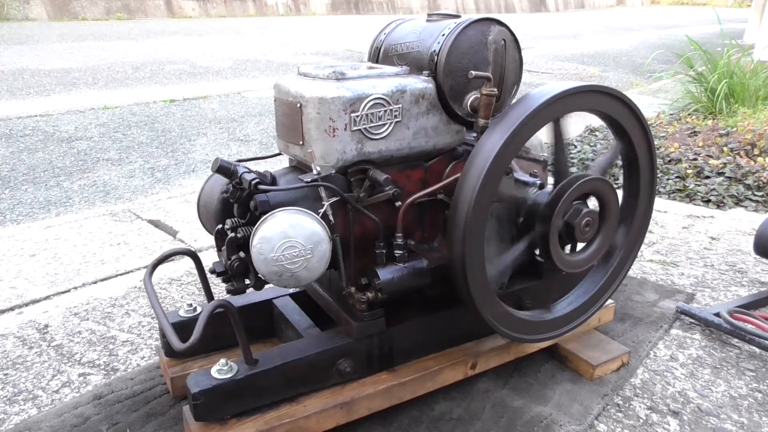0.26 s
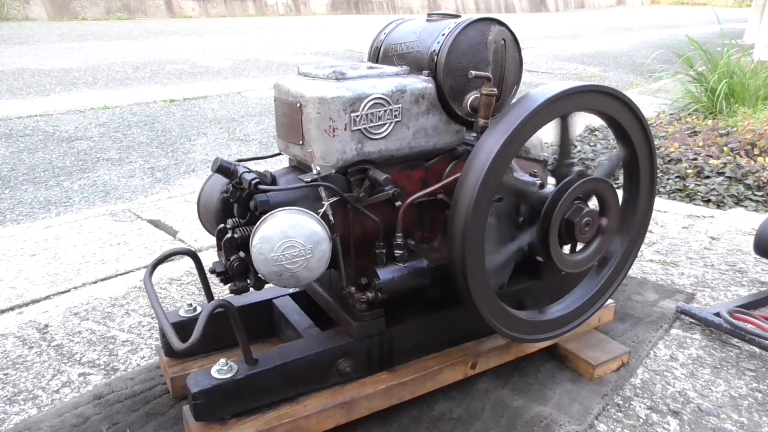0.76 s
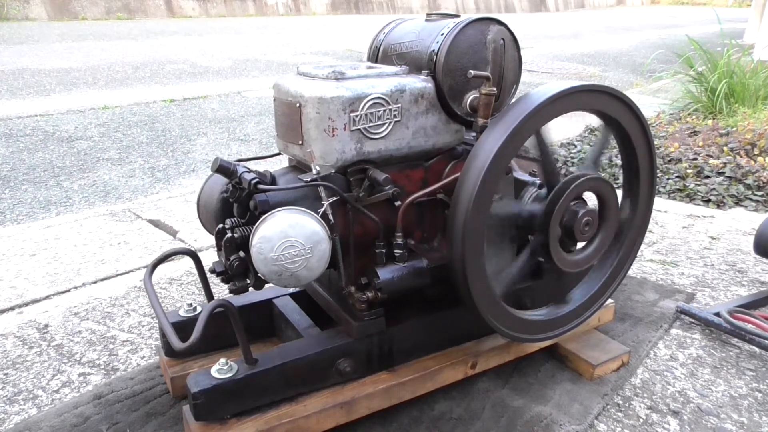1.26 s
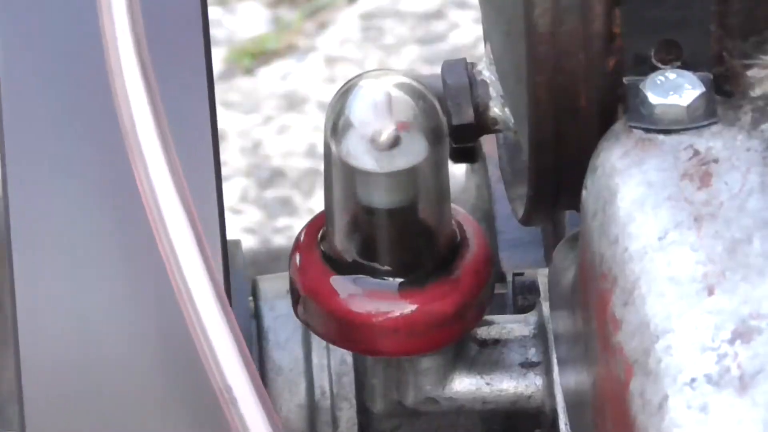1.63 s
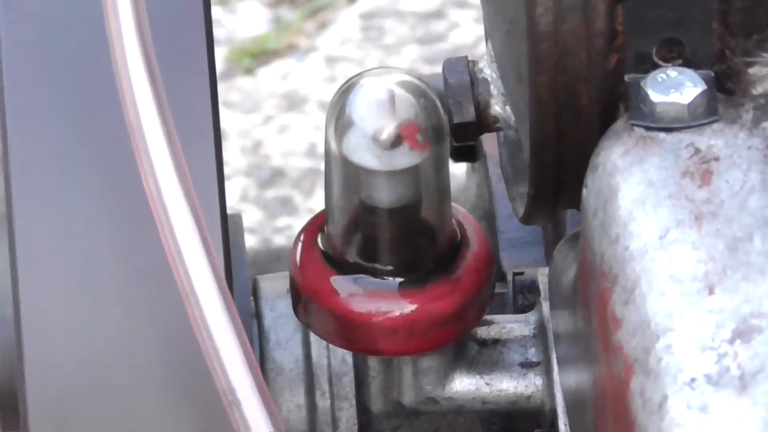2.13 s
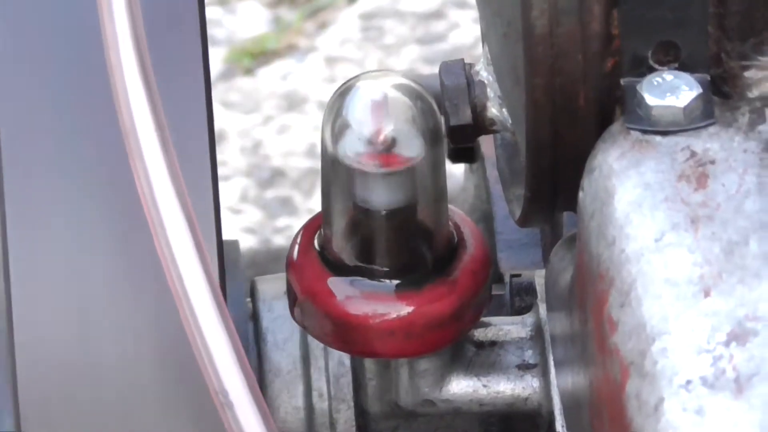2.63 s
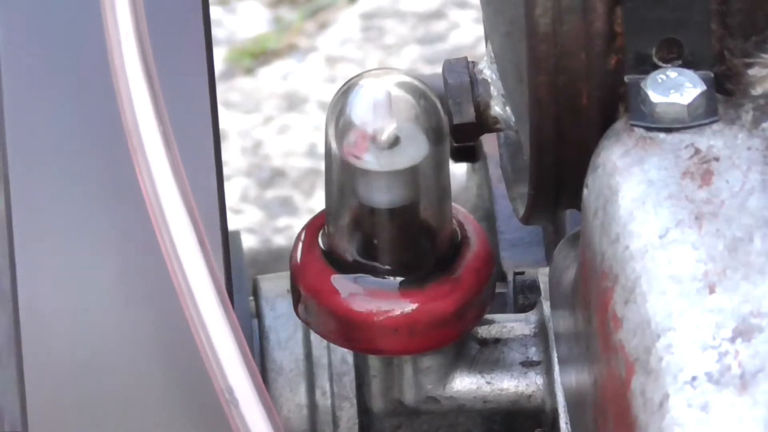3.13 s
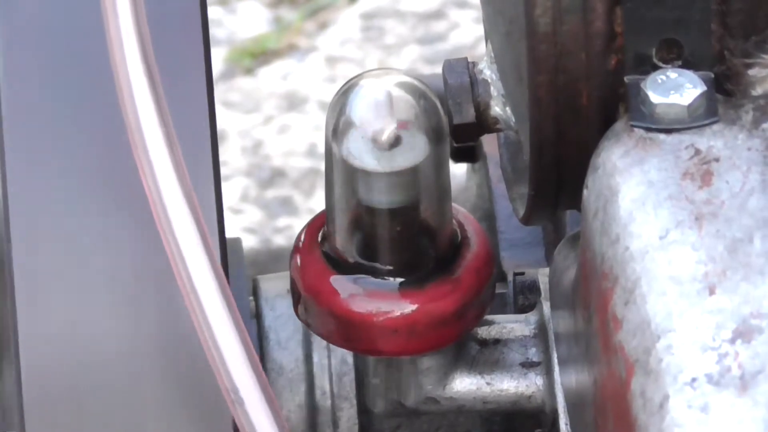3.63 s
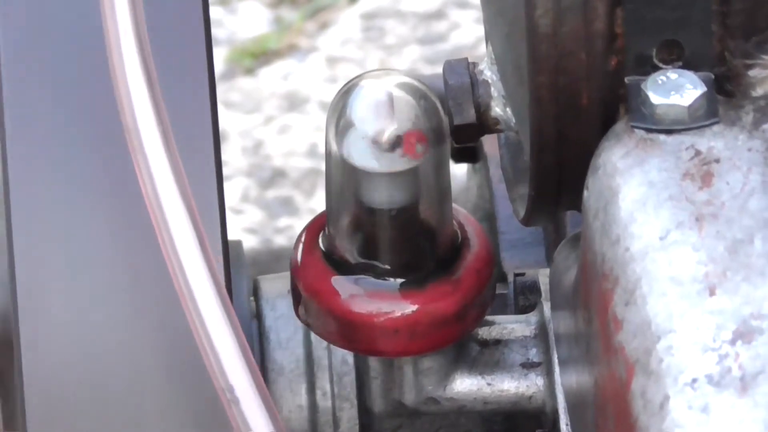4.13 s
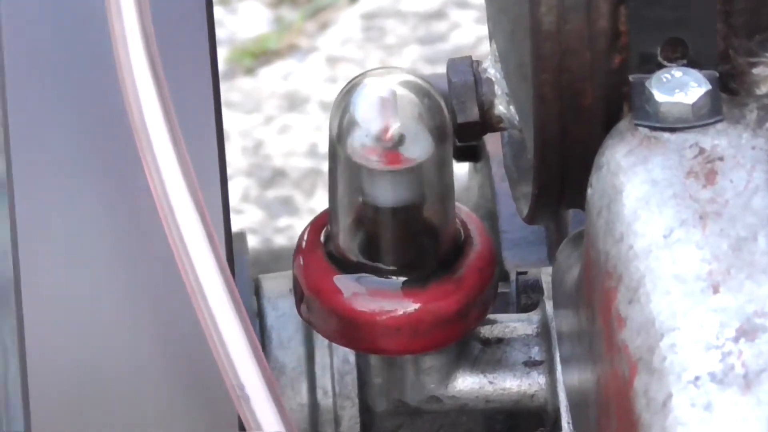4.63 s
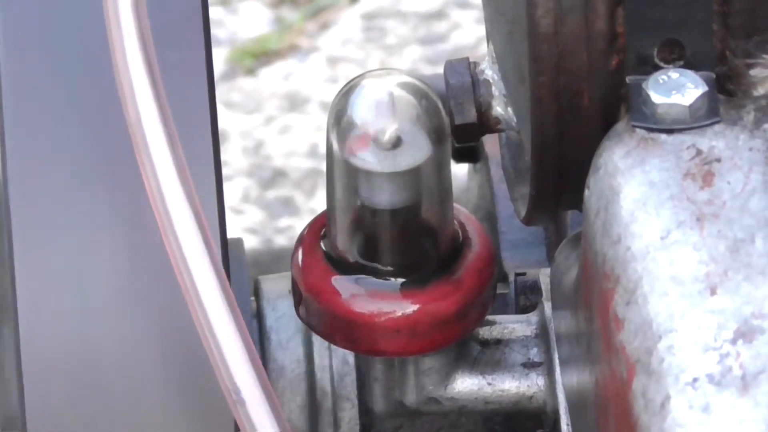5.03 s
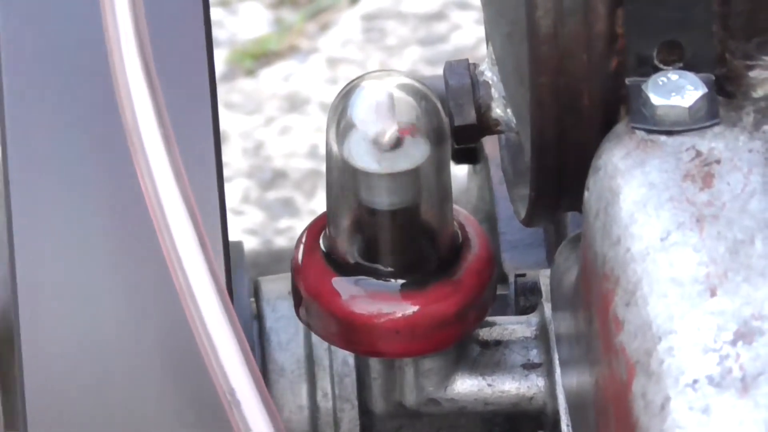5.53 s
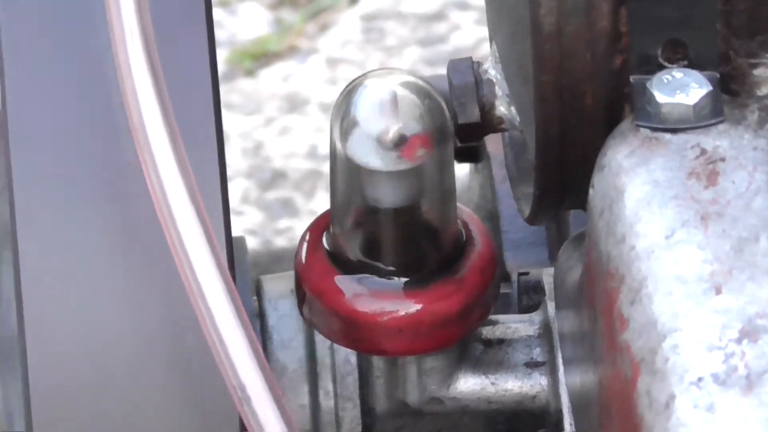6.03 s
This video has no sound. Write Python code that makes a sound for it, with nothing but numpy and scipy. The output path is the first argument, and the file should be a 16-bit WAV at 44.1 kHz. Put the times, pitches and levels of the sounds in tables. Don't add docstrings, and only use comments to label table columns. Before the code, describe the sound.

An old one-cylinder diesel idles steadily on an outdoor pavement, about three and a half cycles a second. Each cycle gives an exhaust pop, a tappet tick, a rattling firing knock and a valve clack with a low intake thump. After about a second and a half the stereo microphone jumps from a few steps away to close beside the engine, making the ticks sharper and the metal clatter more detailed.

```python
import sys
import numpy as np
from scipy import signal
from scipy.fft import rfft, irfft
from scipy.io import wavfile
from scipy.ndimage import uniform_filter1d

SR = 44100
rng = np.random.default_rng(int(sys.argv[2]) if len(sys.argv) > 2 else 0)


def rack_gain(trim_db):
    fader = np.asarray(trim_db, float)
    return 10 ** (fader / 20)


def generate_wav(sig):
    pcm = np.round(np.clip(np.atleast_2d(sig).T, -1, 1) * 32767).astype(np.int16)
    wavfile.write(sys.argv[1], SR, pcm)


N = 276948
T = np.arange(N) / SR
CUT_S = 1.46

CYCLE_S = .28
TAPPET_AT, INTAKE_AT = .269, .73
TICK_SCATTER_DB, BODY_SCATTER_DB = .8, 2.2

# (exhaust opening [s], thump [dB], valve cover [dB])
CYCLES = [(0.0, -20.5, -22), (0.2781, -23, -45), (0.5565, -23.5, -48), (0.8445, -17.5, -23),
          (1.1385, -16, -17), (1.419, -15, -11.5), (1.7028, -21, -12), (1.979, -22.5, -15.5),
          (2.261, -14.5, -9.5), (2.5448, -16.5, -11), (2.8218, -19, -19.5), (3.096, -24, -18.5),
          (3.3763, -17.5, -9), (3.66, -17, -15), (3.9376, -18.5, -14), (4.2127, -21.5, -17.5),
          (4.493, -17.5, -12), (4.7766, -18, -13.5), (5.058, -18.5, -15), (5.3338, -26.5, -20),
          (5.6131, -18, -12.5), (5.9004, -16.5, -14), (6.1847, -23, -15)]
# (peak time [s], knock level [dB], treble level [dB])
FIRING = [(0.1452, -19.5, -16), (0.4186, -29, -23.5), (0.6998, -32, -21), (0.9988, -19, -15.5),
          (1.2842, -21.5, -19), (1.5709, -22.5, -24.5), (1.845, -25.5, -22.5), (2.1238, -27.5, -22),
          (2.4101, -19.5, -13), (2.6879, -15.5, -25.5), (2.9653, -20.5, -22.5), (3.24, -24, -24.5),
          (3.525, -15.5, -25.5), (3.806, -17, -25.5), (4.0793, -32, -26.5), (4.3575, -26.5, -25),
          (4.641, -19.5, -28), (4.9254, -16.5, -20), (5.2029, -18.5, -26.5), (5.4773, -28, -26),
          (5.7635, -19, -25.5), (6.0508, -18, -26.5)]
# (frequency [Hz], level from afar [dB], level close by [dB])
VALVE = [(1504, -21, 0.5), (2230, 2.5, -3), (2950, -24, -9), (3744, -3, -3.5), (5100, 0, -2),
         (5960, -4.5, -9), (7480, 0.5, -2), (8780, 0.5, 7), (10150, -6, -4.5), (11840, -2.5, -4.5),
         (12600, -16, -7), (13400, -26, -29)]
# (frequency [Hz], t60 [s], level from afar [dB], level close by [dB])
KNOCK = [(230, 0.13, -8.5, -33), (634, 0.048, -3, -21), (1023, 0.046, -6.5, -1), (1220, 0.0069, -4.5, -34),
         (1485, 0.012, -29, -4), (1706, 0.013, -10, -6.5), (2070, 0.031, -6.5, -15.5),
         (2460, 0.049, -7, -18)]
# (frequency [Hz], t60 [s], level from afar [dB], level close by [dB])
BLOCK = [(443, 0.05, -9.5, -6), (590, 0.033, -6.5, 0.5), (655, 0.018, 1.5, -18), (849.6, 0.056, 4, 2),
         (959, 0.065, 0, 2), (1042, 0.11, -6.5, -3), (1119, 0.079, -5.5, -1.5), (1436, 0.051, -4, -1),
         (1580, 0.0067, -3.5, -5), (2198, 0.13, -26, -3), (2407, 0.11, -27, -6.5), (2714, 0.019, -14, -5),
         (3197, 0.029, -9.5, -11.5), (4000, 0.033, -12.5, -10), (4586, 0.042, -5.5, -9),
         (5570, 0.15, -43, -17)]


def place(s, db):
    out = np.zeros(N)
    np.add.at(out, np.clip(np.round(s * SR).astype(int), 0, N - 1), rack_gain(db))
    return out


def play(s, db, grain, early=0.):
    return signal.fftconvolve(place(s, db), grain)[int(early * SR):][:N]


def unit(x):
    return x / np.sqrt(np.mean(x ** 2))


def colour(x, points):
    hz = np.fft.rfftfreq(N, 1 / SR) + 1
    point_hz, point_db = np.transpose(points)
    gain = rack_gain(np.interp(np.log(hz), np.log(point_hz), point_db))
    return unit(irfft(rfft(x) * gain, N))


def pair_noise(wide):
    mid, side = rng.standard_normal((2, N))
    return mid + wide * side * np.array([[1], [-1]])


def walk(rate):
    k = int(SR / rate)
    steps = np.repeat(rng.standard_normal(N // k + 1), k)[:N]
    return unit(uniform_filter1d(steps, k))


def burst(s, db, rise, fall):
    t = np.arange(-5 * rise, 7 * fall, 1 / SR)
    return play(s, db, np.exp(np.where(t < 0, t / rise, -t / fall)), 5 * rise)


def ring(force, modes, wide):
    out, rough = 0, pair_noise(wide)
    shifts = rng.integers(N, size=len(modes))
    for (hz, t60, far_db, near_db), shift in zip(modes, shifts):
        r, angle = np.exp(-np.log(1000) / (t60 * SR)), 2 * np.pi * hz / SR
        level = np.where(T < CUT_S, rack_gain(far_db), rack_gain(near_db))
        drive = force * level * np.roll(rough, shift, axis=1)
        strike = np.array([1, 0, -1]) * np.sqrt(1 - r) / 2
        out = out + signal.lfilter(strike, [1, -2 * r * np.cos(angle), r * r], drive)
    return out


def small(parts):
    ring_cycles = 55
    return [(hz, ring_cycles / hz, far_db, near_db) for hz, far_db, near_db in parts]


def tick(s, db):
    contact = burst(s + .0006, db + 13, .0002, .0003)
    chatter = burst(s + .002, db - 1, .0005, .003)
    return contact + chatter


def cam(share):
    s = np.array(CYCLES)[:, 0]
    added = .0045 * ((s < CUT_S) & (s + CYCLE_S > CUT_S))
    length = np.append(np.diff(s), CYCLE_S) - added
    return s + share * length + added * (share > 0), length


def seen(s, pair, scatter=0.):
    return np.where(s > CUT_S, pair[1], pair[0]) + scatter * rng.standard_normal(len(s))


def swells(turn, rows):
    out = 0
    for top_at, top_db, rise_db, fall_db in rows:
        ahead = (top_at - turn) % 4
        below_db = np.minimum(ahead * rise_db, (4 - ahead) * fall_db)
        out = out + rack_gain(top_db - below_db) ** 2
    return np.sqrt(out)


def open_air():
    # (frequency [Hz], level per Hz [dB])
    air_spectrum = [(15, -60), (25, -46), (180, 17.5), (363, -26), (624, 19.5), (775, 17.5), (988, 8),
                    (2910, -35), (11600, -10), (13200, -28), (16000, -57)]
    breeze_db = 2 * walk(8)
    return rack_gain(-45.5 + breeze_db) * colour(pair_noise(0.21), air_spectrum)


def running():
    # (place [blows], top level [dB], rise [dB per blow], fall [dB per blow])
    gear_swells = [
        (.25, -31, 68, 12.5),
        (1.1, -28.5, 15, 62),
        (1.7, -32.5, 20.5, 9.5),
        (2.02, -24.5, 150, 27),
        (2.95, -30.5, 15.5, 54),
        (3.97, -27.5, 15, 400),
    ]
    gas_swells = [
        (0, -31.5, 1000, 20.4),
        (1.1, -41, 75, 35),
        (2.95, -41.5, 22, 33),
        (3.85, -48, 20, 49),
    ]
    silencer_swells = [
        (0.15, -28.5, 290, 75),
        (.7, -56, 6.8, 8.5),
        (2.2, -40.5, 81, 36),
        (3.2, -35, 38, 96),
        (3.85, -40, 45, 12),
    ]
    # (frequency [Hz], level per Hz [dB])
    hiss_spectrum = [(2500, 7.5), (4500, 2.5), (6300, -4.5), (8300, 5), (10000, 4), (12500, -3),
                     (14500, -11), (16000, -30)]
    firing_s = np.array(FIRING)[:, 0]
    blows = np.sort(np.concatenate([cam(0)[0], cam(TAPPET_AT)[0], firing_s, cam(INTAKE_AT)[0][:-1]]))
    turn = np.interp(T, np.append(blows, blows[-1] + 0.086), np.arange(len(blows) + 1)) % 4
    far = T < CUT_S

    gusts_db = 1.5 * walk(12) + 2 * walk(250)
    hiss = swells(turn, gas_swells) * rack_gain(gusts_db + 1 * far) * colour(pair_noise(0.39), hiss_spectrum)

    flutter = swells(turn, silencer_swells) * rack_gain(2 * walk(60) - 5.5 * far)
    silencer = ring(flutter, [(565, 0.024, -28, 2.0), (634, 0.082, 2.0, -4),
                              (830, 0.0099, -10, -43), (334, 0.021, 12.5, 5.5)], 0.19)

    glide_hz = np.interp(turn, [3.3, 4], [540, 820])
    glide_db = np.interp(turn, [3.2, 3.5, 3.8, 4], [-65, -36.5, -28.5, -36])
    glide_db = glide_db - 4 * far - 40 * (turn < 3.2)
    glide = rack_gain(glide_db) * walk(260) * np.sin(2 * np.pi * np.cumsum(glide_hz) / SR)

    mesh = swells(turn, gear_swells) * rack_gain(-10.0 + 3.93 * walk(150) + 0.5 * far)
    clatter = rack_gain(-2.0) * mesh * colour(pair_noise(0.056), [(300, -3), (900, 1.0), (1800, -4), (3500, -14.0),
                                                            (6000, -23), (9000, -37)])
    return hiss + silencer + glide + clatter, mesh


def tappet():
    s = cam(TAPPET_AT)[0]
    tick_db = seen(s, (-23.5, -14), TICK_SCATTER_DB)
    body_db = seen(s, (-28.5, -20.5), BODY_SCATTER_DB)
    body = burst(s + 0.00074, body_db - 4.5, 0.000098, 0.0031)
    return ring(body, small(VALVE[:5]) + KNOCK[:3], 0.11), tick(s, tick_db)


def intake():
    s = cam(INTAKE_AT)[0][:-1]
    thump_db, cover_db = np.transpose(CYCLES)[1:, :-1]
    seat_db = seen(s, (-27, -27), TICK_SCATTER_DB)
    delay_ms = seen(s, (14.5, 13.3)) + .4 * (thump_db - np.median(thump_db))
    t = np.arange(0, .06, 1 / SR)
    cover = play(s, cover_db, -np.sin(2 * np.pi * 615 * t) * np.exp(-t / 0.004))

    u = t - .008
    swell = (t / 0.011) ** 0.92 * np.exp(.8 - 0.82 * (t / 0.012) ** 1.69)
    column = -np.cos(2 * np.pi * (166 * u + 1100 * u ** 2)) * swell
    thump = play(s + delay_ms / 1000, thump_db, column, 0.00814)
    gulp_grain = rack_gain(-9) * np.sin(2 * np.pi * 100 * t) * np.exp(-(t / 0.021) ** 2)
    gulp = play(s + 0.006, thump_db, gulp_grain)

    seat = burst(s + 0.00015, seat_db + 7.5, 0.00035, 0.00051)
    seat = seat + burst(s + 0.003, seat_db - 7.5, 0.00042, 0.0051)
    bounce_db = seat_db - 16 + 4 * rng.standard_normal(len(s))
    bounce = ring(burst(s + .0235, bounce_db, .0004, .002), small(VALVE[6:9]), .2)
    return bounce + cover + thump + gulp + ring(seat, small(VALVE), 0.25), seat * rack_gain(0.5)


def firing():
    # (frequency [Hz], level from afar [dB], level close by [dB])
    ping_modes = [(3120, -23, -5.5), (4280, 8, -2), (4700, -4, 2), (5100, 6.5, 2.5), (5770, -9, -3),
                  (7400, -1.5, -5.5), (8300, -1, 4.5), (9900, -5, -14), (11300, -1.5, 0), (13900, -23, -20)]
    # (frequency [Hz], level [dB])
    chamber_modes = [(1010, -3.5), (1520, -2), (2000, -9.5)]
    s, knock_db, treble_db = np.transpose(FIRING)
    catch_s = s - .006
    lead_db = -19 + 0.2 * (knock_db - np.median(knock_db))
    knock = burst(s, knock_db + 5, .002, .0008) + burst(catch_s, lead_db, .0003, .006)
    treble = burst(s, treble_db - 16, 0.0028, 0.0024) + burst(catch_s, treble_db - 16, 0.00018, 0.0076)

    t = np.arange(-.008, .01, 1 / SR)
    shape = np.exp(-np.where(t < 0, t / 0.0026, t / 0.0013) ** 2)
    chamber = 0
    for hz, db in chamber_modes:
        at = s + rng.random(len(s)) / hz
        level_db = knock_db + db + seen(s, (-6, 0), 1.5)
        chamber = chamber + play(at, level_db, shape * np.sin(2 * np.pi * hz * t), .008)
    return chamber + ring(knock, KNOCK, 0.14) + ring(treble, small(ping_modes), 0.3), knock * rack_gain(-11.5)


def exhaust():
    pipe_hz = 536.6
    # (multiple of the pipe's pitch [1], t60 [s], level from afar [dB], level close by [dB])
    pipe_modes = [(0.254, 0.025, -57, -10), (0.446, 0.026, -6, -17.5), (1.002, 0.011, -6, 3.5),
                  (2, 0.0011, -4.5, -0.5), (3, 0.0058, -13.5, -15), (4, 0.00085, -17.5, -11)]
    s, length = cam(0)
    delay_ms = seen(s, (4.11, 5.5)) + seen(s, (10, 72)) * (length - CYCLE_S)
    tick_db = seen(s, (-25, -12.5), TICK_SCATTER_DB)
    pop_db = seen(s, (-6, -10.5), .5)
    clack_db = seen(s, (-17.5, -22.5), BODY_SCATTER_DB)
    near = s > CUT_S
    t = np.arange(0, .04, 1 / SR)
    at = s + delay_ms / 1000

    trips = np.round((delay_ms / 1000 - .0005) * pipe_hz - .5) + .5
    knock_grain = -np.sin(2 * np.pi * pipe_hz * t) * np.exp(-t / 0.0046)
    knock = play(at - .0003 - trips / pipe_hz, pop_db + np.where(near, -8, -22), knock_grain)

    build = np.clip(t / .0004, 0, 1) * np.clip(.75 + t / .006, 0, 1.15)
    fading = np.clip(t - .0025, 0, 1)
    pop = 0
    for k, t60, far_db, near_db in pipe_modes:
        wave = np.sin(2 * np.pi * k * pipe_hz * (t - .0007)) * rack_gain(-60 * fading / t60) * build
        pop = pop + play(at, pop_db - 3.5 + np.where(near, near_db, far_db), wave, .001)
    echo = np.where(T < CUT_S, rack_gain(-12.5), rack_gain(-20)) * np.roll(pop, int(.0064 * SR))

    clack = burst(at + 0.0064, clack_db, 0.0024, 0.0045)
    sound = knock + pop + echo + ring(clack * rack_gain(-13), small(VALVE[1:6]), 0.12)
    sound = sound + ring(burst(at, pop_db - 19, 0.0042, 0.0027), BLOCK[1:7], 0.59)
    return sound, clack, tick(s, tick_db)


def iron_block(clack, knock, seat, mesh):
    blows = clack + knock + seat
    low = ring(blows * rack_gain(-2.5) + mesh, BLOCK[:9], 0.16)
    middle = ring(blows + mesh * rack_gain(-22.0), BLOCK[9:12], 0.078)
    high = ring(clack + seat + mesh * rack_gain(-6.0), BLOCK[12:], 0.36)
    return low + middle + high


def rocker(ticks):
    # (frequency [Hz], level from afar [dB], level close by [dB])
    rocker_modes = [(3350, -18, -20.5), (4790, -7, -20), (5550, -13, -42), (5920, -29, -29),
                    (7680, -5, -14), (8330, -10, -13), (9540, -8, -12.5), (10960, -2, -10),
                    (12100, -15, -7.5), (13040, -8, -16), (12500, -15, -10), (14400, -26, -21)]
    return ring(rack_gain(-2.5) * ticks, small(rocker_modes), 0.26)


def ports(x, balance, lead):
    hz = np.fft.rfftfreq(N, 1 / SR)
    loudness = rack_gain(np.interp(hz, *np.transpose(balance)) / 2)
    half = loudness * np.exp(.5j * np.interp(hz, *np.transpose(lead)))
    return irfft(rfft(x) * np.array([half, 1 / half]), N)


def microphones(engine):
    # (frequency [Hz], left leads [rad])
    far_pair = [(60, -1.0), (200, -2.0), (380, -1.5), (1290, 0.5), (2380, 0.5), (4400, -1.0), (8120, 0.5),
                (15000, -2.0)], [ (0, 0), (860, 0.2), (2580, -0.1), (4300, -0.3), (6120, 0.0), (8900, -0.4),
                (12500, 0.0), (15300, -0.2)]
    # (frequency [Hz], left leads [rad])
    near_pair = [(60, -1.0), (170, -1.5), (300, -4.0), (800, -0.8), (2000, 0.3), (4400, -2.0), (8120, -0.5),
                 (12500, -5)], [ (0, 0), (860, 0.1), (2670, -0.2), (4500, -0.4), (7060, -0.1), (9990, -2.1),
                 (11600, -0.9), (15000, -0.9)]
    return np.where(T < CUT_S, ports(engine, *far_pair), ports(engine, *near_pair))


def scene():
    hiss, mesh = running()
    tap, tappet_tick = tappet()
    valve, seat = intake()
    rattle, knock = firing()
    pop, clack, rocker_tick = exhaust()
    engine = pop + tap + rattle + valve + hiss
    engine = engine + iron_block(clack, knock, seat, mesh) + rocker(rocker_tick + tappet_tick)
    return microphones(engine) + open_air()


def roll_off(x):
    return signal.sosfilt(signal.butter(12, 16390, fs=SR, output="sos"), x)


def record(dry):
    x = signal.sosfilt(signal.butter(2, 95, "high", fs=SR, output="sos"), dry)
    x = signal.sosfilt(signal.cheby2(8, 45, 16400, fs=SR, output="sos"), x)
    return roll_off(x)


dry = scene()
out = record(dry)
generate_wav(out)
```